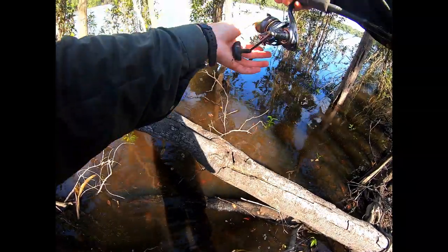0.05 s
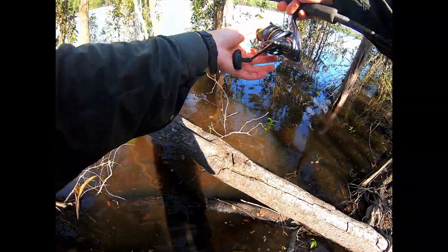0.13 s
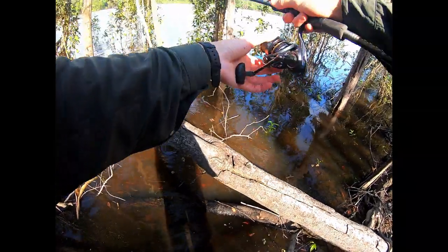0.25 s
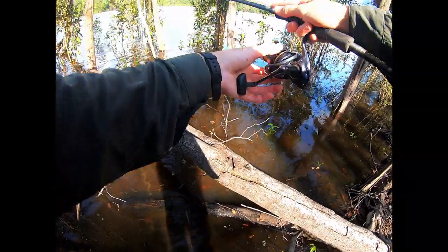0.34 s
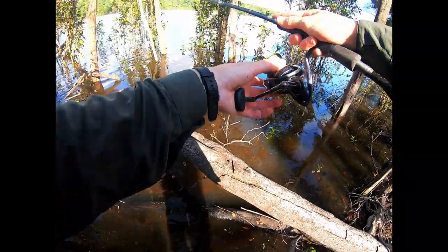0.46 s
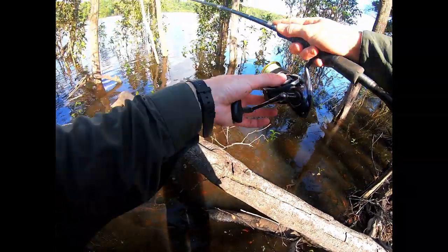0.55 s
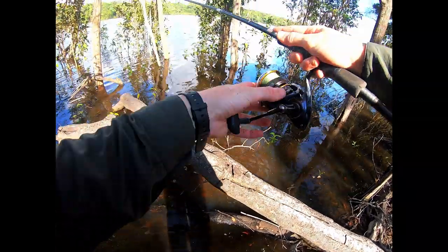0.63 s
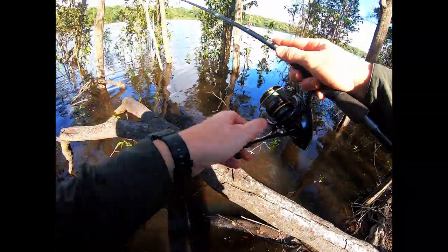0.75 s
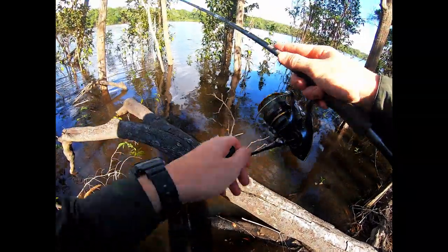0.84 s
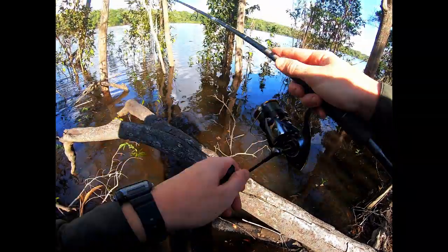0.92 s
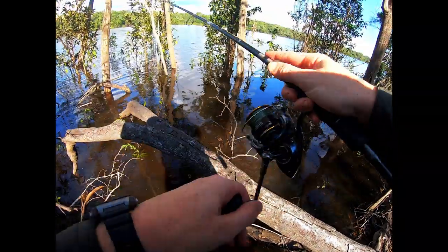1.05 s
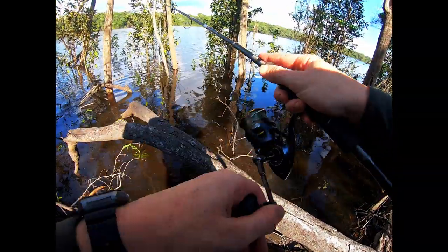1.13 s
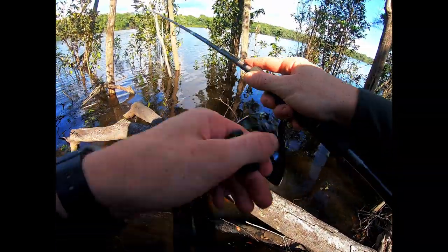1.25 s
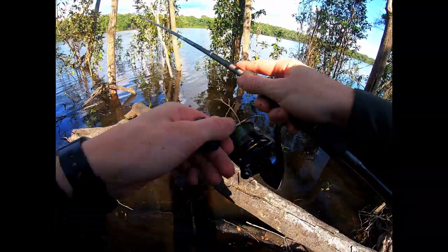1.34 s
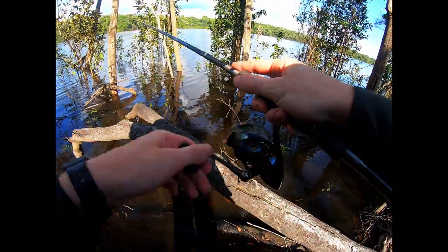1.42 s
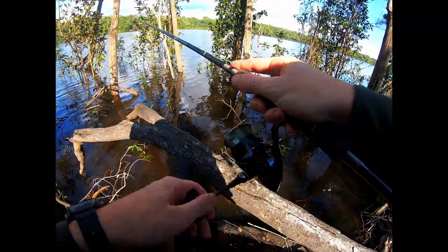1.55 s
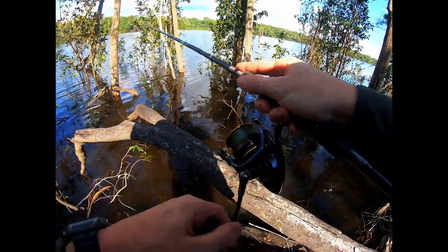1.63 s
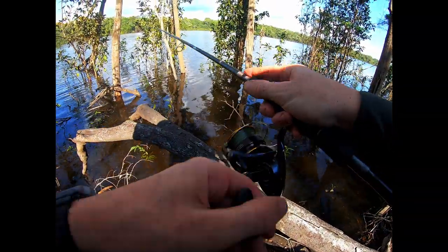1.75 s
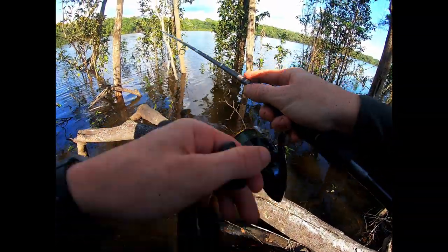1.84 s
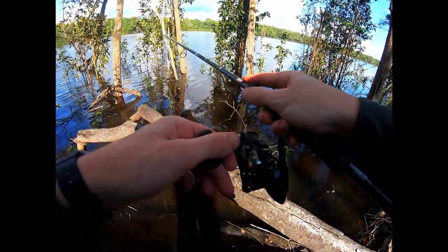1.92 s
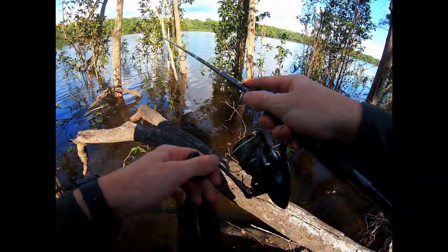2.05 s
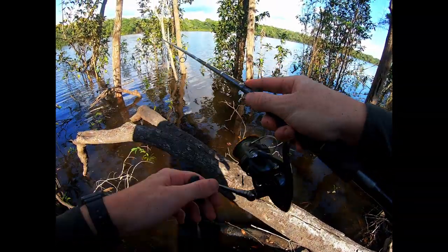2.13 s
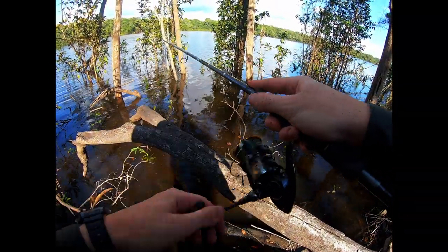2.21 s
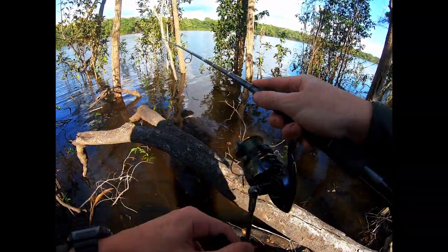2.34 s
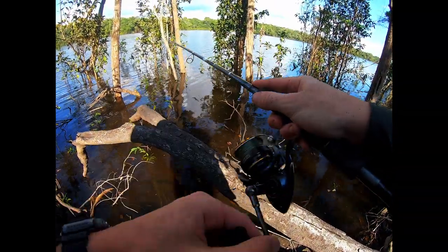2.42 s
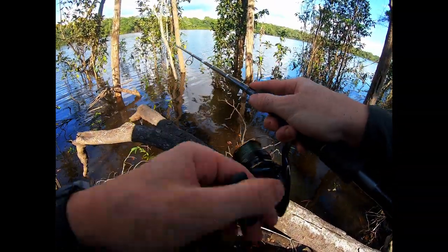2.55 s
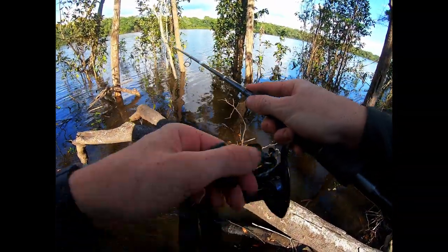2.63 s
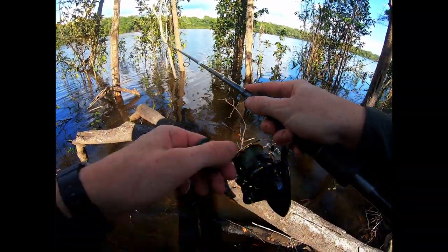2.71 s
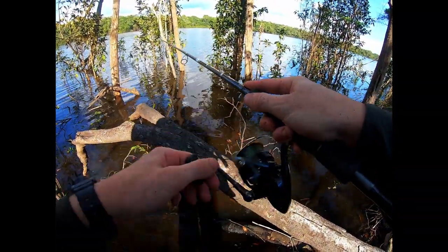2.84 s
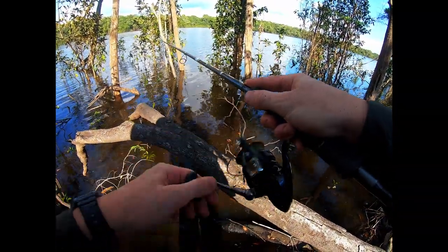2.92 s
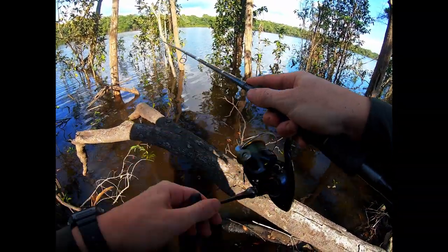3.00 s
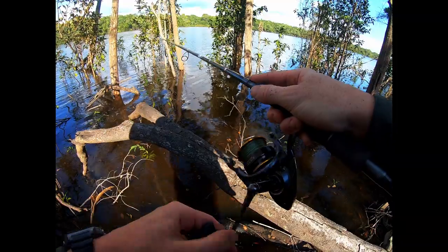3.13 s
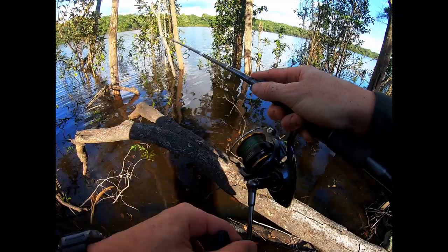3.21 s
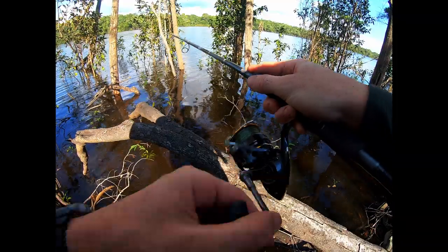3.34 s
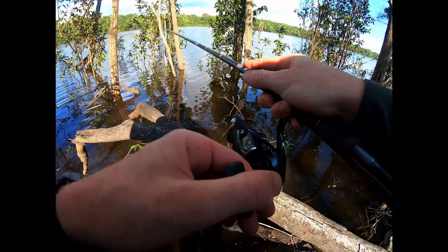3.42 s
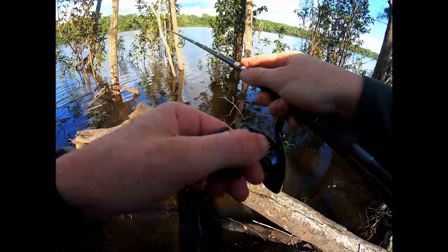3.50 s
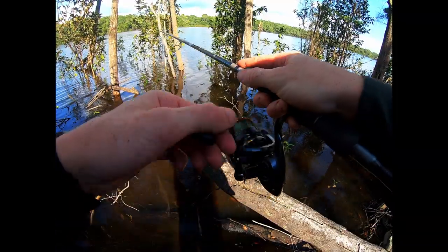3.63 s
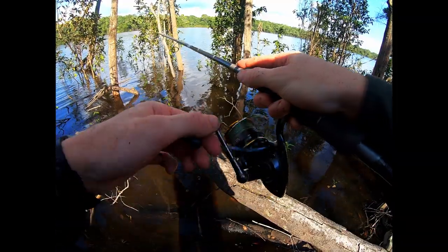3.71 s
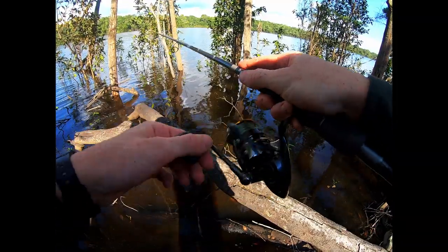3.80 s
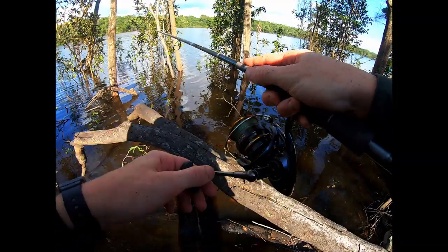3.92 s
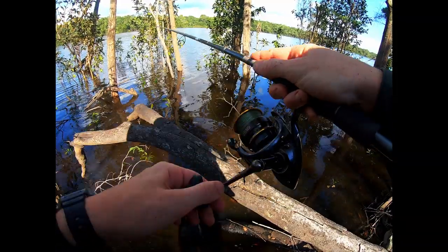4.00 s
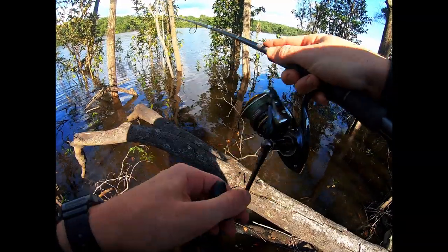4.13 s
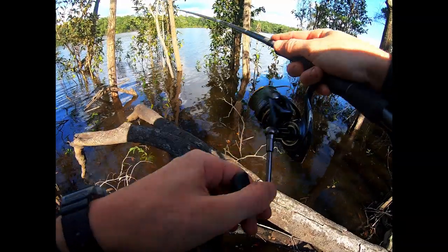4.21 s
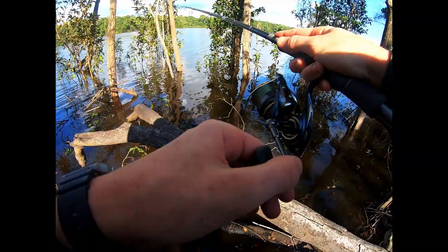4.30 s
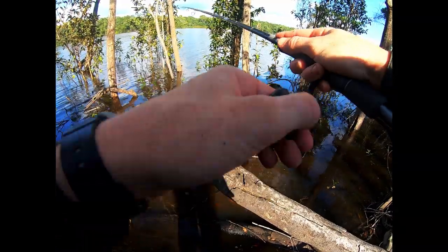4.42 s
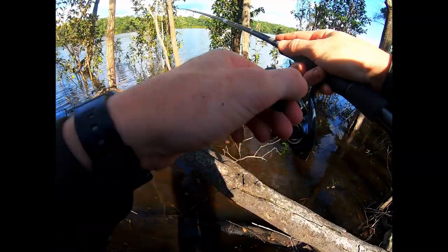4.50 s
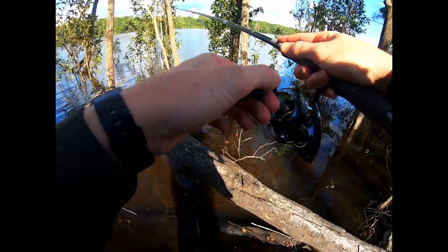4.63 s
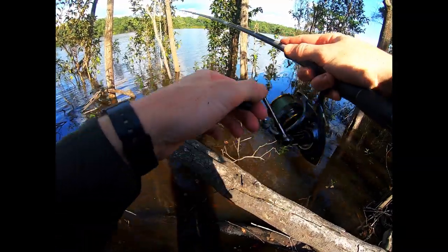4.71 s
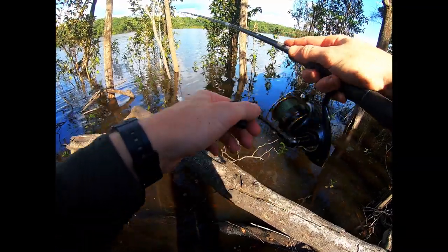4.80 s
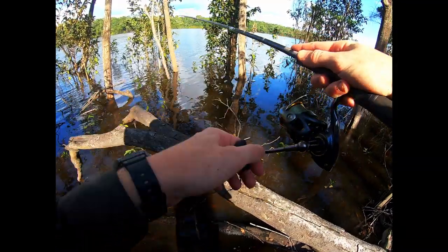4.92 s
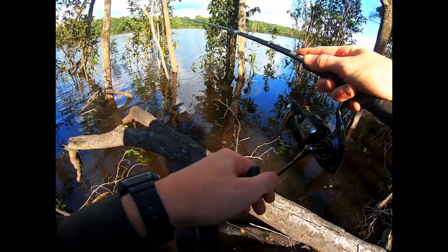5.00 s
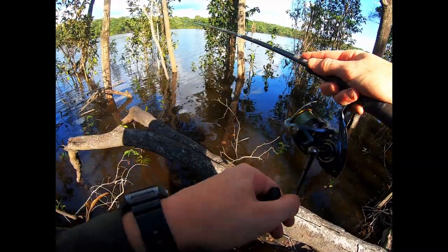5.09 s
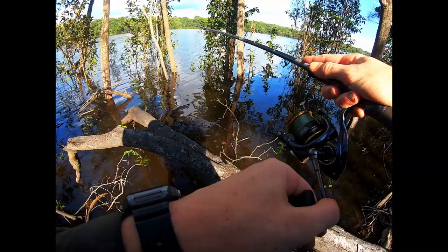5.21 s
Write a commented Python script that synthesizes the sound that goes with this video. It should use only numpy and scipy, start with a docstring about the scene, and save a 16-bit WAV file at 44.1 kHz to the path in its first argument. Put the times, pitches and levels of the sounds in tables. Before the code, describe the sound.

A quiet, open lake shore heard in stereo from the angler's chest: soft low air, slight wavering rush and a thin high hiss throughout. A faint bump opens it, with a tiny tick at 0.2 s and growing sleeve rustle. From 0.55 s hands scuff the tackle, the hinge grates and briefly creaks, and at 0.70 s the bail slams shut with a bright, dry metallic crack, by far the loudest event. It rebounds at 0.73 s and chatters out by 0.77 s, with a dull rod thump and short scatter from the trunks. Light ticks and cloth brushes follow until 0.9 s. From about 1 s the reel winds: a subdued grainy gear whirr, fine fizz and faint wavering singing of wet line. Soft knocks come near 2.2 and 2.5 s. Crisp ticks crowd between 2.8 and 3.9 s, then become mostly fainter and thinner as winding continues to 5.25 s.

```python
"""On a quiet lake shore an angler closes the bail of a spinning reel at chest height and winds in.
Soft outdoor air and thin high hiss are filtered noise; cloth strokes, knocks and scuffs are noise bursts.
The hinge grates and creaks; the bail snaps shut and rebounds as noise cracks over damped metal modes.
Gears then whirr as pulsed noise, and wet line fizzes and sings as friction noise around gliding tones.
Ticks excite short damped modes: clear ones at listed times, faint ones on beats of the reel's speed."""
import sys
import numpy as np
from scipy import signal
from scipy.fft import rfft, irfft
from scipy.io import wavfile

SR = 44100
rng = np.random.default_rng(int(sys.argv[2]) if len(sys.argv) > 2 else 0)


def master(y):
    """Save y as 16-bit WAV."""
    cut = np.clip(np.atleast_2d(y).T, -1, 1)
    pcm = np.round(cut * 32767)  # scale
    wavfile.write(sys.argv[1], SR, pcm.astype(np.int16))


N = 231657
T = np.arange(N) / SR  # s
FREQS = np.maximum(np.arange(N // 2 + 1) * SR / N, 1)  # Hz
TOP_HZ = 15800
MESHES_PER_TICK = 2.8

# correlation of noise between the two ports: [f/Hz, correlation]
PORT_CORRELATION = [(50, -0.19), (250, 0.39), (750, -0.24), (1500, -0.21), (2800, 0.81), (4200, 0.82),
                    (6500, 0.12), (9000, 0.016)]
# spectrum of outdoor air: [f/Hz, relative level/dB]
AIR_SPECTRUM = [(20, -11), (45, -7.5), (70, -18), (108, -29), (160, 2), (230, 0), (330, -7.5), (560, -6),
                (770, -0.5), (980, -4), (1250, -3), (2200, -13), (3500, -24.5), (6500, -6), (8400, -13),
                (11500, -37.5), (15000, -36)]
# steady bands of thin hiss: [f/Hz, width/Hz, level/dB, left minus right/dB]
HISS_BANDS = [(6860, 100, -64.5, -3.5), (7940, 150, -65.5, 2), (8420, 360, -60, -6.5)]
# strokes of sleeve and slack line: [peak t/s, level/dB, rise/s, fall/s]
STROKES = [(.36, -55, .42, 0.33), (.58, -51, 0.059, 0.06), (.755, -43.5, 0.063, 0.036),
           (.895, -45, 0.06, 0.06)]
# spectrum of the strokes: [f/Hz, relative level/dB]
STROKE_SPECTRUM = [(500, -10.5), (2800, -14), (5500, -7), (8200, -2.5), (9200, -7.5), (10400, -14),
                   (11500, -23.5), (15000, -32)]
# knocks and scuffs of hands and tackle: [onset t/s, centre f/Hz, nominal width/Hz, level/dB, time to peak/s]
KNOCKS = [(0, 232, 200, -53, 0.029), (0.197, 2700, 1200, -54.5, .004), (0.527, 6000, 5000, -47, 0.0024),
          (.47, 70, 80, -62, 0.021), (0.556, 4650, 5000, -38, 0.0042), (0.557, 880, 620, -46.5, 0.015),
          (0.592, 860, 400, -42, 0.013), (0.61, 700, 605, -44.5, 0.019), (0.63, 870, 600, -33, 0.001),
          (.915, 38, 25, -59, 0.03), (1.405, 487, 300, -57, 0.066), (2.174, 718, 604, -43, 0.0089),
          (2.184, 390, 150, -43.5, 0.012), (2.466, 1350, 600, -37, 0.006), (4.108, 203, 109, -60, 0.05)]
# clear ticks of the reel as it is handled, settles and turns: [t/s, relative body level/dB, relative ping level/dB]
CLEAR_TICKS = [(0.1967, -44.5, -58), (.7757, -32, -56), (.8205, -35.5, -58), (.8406, -50, -50),
               (.875, -41, -48), (1.5535, -52, -45), (1.574, -54, -41.5), (2.0015, -42, -48),
               (2.109, -37, -49), (2.146, -33, -43), (2.173, -41, -50), (2.8397, -36, -61),
               (2.8698, -44, -50), (2.8995, -38, -61), (2.9617, -41, -53), (2.9924, -30, -41),
               (3.0247, -35.5, -48), (3.0545, -37, -38.5), (3.1077, -42.5, -49), (3.1639, -37, -47),
               (3.187, -37, -46), (3.193, -36, -45), (3.2461, -37, -50), (3.3059, -41, -57),
               (3.334, -39, -56), (3.365, -35.5, -52), (3.5004, -31, -44), (3.5367, -33.5, -50),
               (3.570, -35.5, -54), (3.701, -32, -56), (3.8664, -29, -42.5), (3.9008, -32.5, -45),
               (4.159, -59, -44), (4.251, -56, -46.5), (4.3442, -54, -46.5), (4.403, -40.5, -54),
               (4.438, -54, -48), (4.471, -56, -49.5), (4.504, -56, -49), (4.537, -56, -45.5),
               (4.6333, -62, -45.5), (4.7771, -40.5, -46.5), (4.911, -41, -54), (4.943, -43, -54),
               (5.0913, -40, -47), (5.124, -42, -49), (5.201, -40, -63), (5.233, -39.5, -60)]
# centre levels of the faint ticks on beats between: [t/s, relative body level/dB, relative ping level/dB]
FAINT_TICK_LEVELS = [(1.5, -54, -52), (2.7, -52, -65), (3.2, -56, -57), (3.8, -48, -64), (4.5, -61, -51),
                     (5.0, -58, -60)]
# speed of the reel: [t/s, tick rate/(1/s)]
REEL_SPEED = [(2.15, 40), (3.0, 34), (3.35, 35), (3.5, 27), (3.87, 29.3), (5.2, 32.2)]
# low modes of a tick: [nominal f/Hz, relative level/dB, left minus right/dB]
TICK_BODY_MODES = [(1750, -20, 0), (2680, -14.5, -1), (3060, 0, -1)]
# high modes of a tick: [nominal f/Hz, relative level/dB, left minus right/dB]
TICK_PING_MODES = [(5364, -4.5, -9), (5670, -0.5, -12), (6800, -3, -3), (8270, -7, -4)]
# spectrum of the contact noise in a tick: [f/Hz, relative level/dB]
CONTACT_SPECTRUM = [(500, -3), (1800, 23), (3000, 18.5), (4500, 18.5), (5600, 14),
                    (7000, 21), (10000, 12.5), (14000, -15)]
# grating of the hinge as the bail is pushed over: [t/s, level/dB]
GRATE_LEVEL = [(.553, -58), (.57, -43), (.58, -49), (.6, -47), (.628, -44), (.642, -50.5), (.657, -53.5),
               (.69, -52)]
# spectrum of the grating: [f/Hz, relative level/dB]
GRATE_SPECTRUM = [(1500, -17), (2300, -3), (2750, -9.5), (3350, -3), (4400, -13), (9000, -28), (14000, -43)]
# creak of the hinge: [t/s, mean f/Hz, level/dB]
CREAK_GLIDE = [(.598, 998, -38), (.608, 750, -39), (.612, 360, -33), (.617, 340, -33), (.623, 816, -35.5),
               (.645, 620, -46)]
# blows of the bail as it trips, snaps shut, rebounds and chatters: [t/s, relative level/dB, crack t60/s]
BLOWS = [(0.6057, -23.5, 0.012), (.6305, -30, .013), (0.6922, -14.5, 0.0176), (.7019, 3.5, 0.029),
         (.7035, -4.5, 0.032), (0.7142, -10, 0.012), (0.7271, -1.5, 0.022), (0.7287, -8.5, 0.018),
         (0.7347, -10.5, .026), (.746, -20, .03), (.759, -28, .016), (.7695, -35, .012)]
# ring of bail wire and rotor: [f/Hz, t60/s, relative level/dB, left minus right/dB, phase between ports/rad]
METAL_MODES = [(1047, 0.1, -24.5, -11, 1.1), (1940, 0.06, -17, 3, 0.52), (2108, 0.065, -13, -5, 0.78),
               (2204, 0.06, -16, 3, 1.1), (2450, 0.093, -20, 3, 0.96), (2881, 0.033, -6.5, -3, 0.37),
               (2956, 0.053, -11, 0, .3), (3131, 0.072, -21, -4, 0.11), (3530, 0.06, -16, 0, 0.45),
               (3680, 0.067, -13, 2, 0.12), (4091, 0.083, -17, 0, 0.72), (5430, 0.06, -12, -10, 0.66),
               (5410, 0.044, -11, -10, 0.69), (5675, 0.035, -8.5, -4.5, 0.38),
               (5920, 0.044, -12.5, -13, .5), (6140, 0.06, -14, -5, 0.41), (6500, 0.065, -18, 2, 1.1),
               (7800, 0.049, -18, 3, 1.4)]
# spectrum of the crack at each port: [f/Hz, relative left level/dB, relative right level/dB]
CRACK_SPECTRUM = [(101, -37, -35), (400, -27, -22), (680, -24, -11), (1140, -13, -0.5), (1550, -11, -16.5),
                  (2060, 1, 3), (2500, -4.5, -0.5), (3420, 0, 1.5), (4800, -8, -7.5), (5600, -6, 8.5),
                  (7250, -2, -9), (8930, -9, -3.5), (10900, -14, -21.5), (11400, -29, -35)]
# correlation of the crack between the ports, before limiting to 0.95: [f/Hz, correlation]
CRACK_CORRELATION = [(200, 0.97), (900, -0.24), (2100, 0.78), (4000, 1.0), (6000, 0.28), (8000, -0.19)]
# spectrum of the scatter from the trunks: [f/Hz, relative level/dB]
SCATTER_SPECTRUM = [(100, -17), (300, 7), (1000, 14), (3200, 10.5), (7000, -21), (14000, -32)]
# correlation of the rod's thump between the ports, before limiting to 0.95: [f/Hz, correlation]
THUMP_CORRELATION = [(200, 1.0), (900, 0.84)]
# winding effort, the reference for whirr and fizz: [t/s, relative level/dB]
EFFORT = [(1.0, -70.5), (1.18, -58.5), (1.32, -57), (1.83, -55), (2.04, -55.5), (2.17, -55.5),
          (2.99, -57.5), (4.02, -61.5), (4.35, -59), (4.59, -61.5), (5.02, -59.5), (5.25, -58)]
# spectrum of the running gears at each port: [f/Hz, relative left level/dB, relative right level/dB]
GEAR_SPECTRUM = [(153, -45, -28), (422, -2, 0), (860, -23.5, -11), (1930, -3.5, -9), (2800, -6.5, -3.5),
                 (3530, -6.5, -5.5), (4530, -12.5, -11), (5900, -13, -7), (6750, -23, -23),
                 (7400, -26, -26), (8250, -17, -9), (8400, -30, -27), (15000, -42, -47)]
# narrow wavering gear resonances: [f/Hz, width/Hz, mean level against effort/dB]
GEAR_RESONANCES = [(796, 210, -10), (1260, 420, -4), (2100, 190, -12), (2853, 150, -7.5)]
# fine fizz of wet line: [t/s, mean level against effort/dB]
FIZZ_LEVEL = [(1.2, -10.5), (2.1, -12.5), (2.8, -13), (3.2, -4.5), (3.7, -31), (4.3, -11), (5.25, -7.5)]
# spectrum of the fizz: [f/Hz, relative level/dB]
FIZZ_SPECTRUM = [(2000, -7), (6000, -3.5), (10200, 9.0), (11500, -4.0), (13000, -2.5), (15500, -13)]
# line rubbing low on the roller: [t/s, mean f/Hz, mean level/dB]
ROLLER_RUB = [(1.0, 1195, -79), (1.55, 1130, -61), (1.66, 1087, -50), (1.79, 1171, -57.5),
              (1.89, 1041, -53), (2.12, 960, -60), (2.47, 1102, -53.5), (2.8, 1002, -71)]
# wet line rubbing over the guides: [t/s, mean f/Hz, mean level/dB]
GUIDE_RUB = [(1.1, 2090, -62), (1.4, 1850, -63), (1.78, 1820, -55.5), (2.0, 1895, -63), (2.42, 1740, -66),
             (2.53, 1678, -55), (2.9, 1755, -59.5), (3.15, 1697, -55), (3.36, 1703, -55),
             (3.58, 1900, -61.5), (3.8, 2062, -55.5), (3.98, 2120, -64), (4.22, 2222, -57.5),
             (4.76, 1836, -53), (5.25, 1853, -54.5)]


def undb(db):
    """Amplitude ratio: twenty decibels make a factor of ten."""
    return 10 ** (np.asarray(db) / 20)


def unit(x):
    """Normalization to a root-mean-square value of 1."""
    return x / np.sqrt(np.mean(x ** 2))


def curve(rows, axis=1):
    """Linear interpolation of one table column in time."""
    rows = np.array(rows)
    return np.interp(T, rows[:, 0], rows[:, axis])


def pan(db):
    """Level difference between ports: left and right gains that differ by db."""
    return undb(np.array([[db], [-db]]) / 2)


def over_hz(rows):
    """Interpolation of spectral columns along logarithmic frequency."""
    hz, *columns = np.transpose(rows)
    return np.array([np.interp(np.log(FREQS), np.log(hz), c) for c in columns])


def colour(x, rows):
    """Minimum-phase filtering: a folded cepstrum gives a causal filter of unit power gain."""
    gain = unit(undb(over_hz(rows)))
    cepstrum = irfft(np.log(gain), N)
    cepstrum[:, 1:N // 2] *= 2
    cepstrum[:, N // 2:] = 0
    return irfft(rfft(x) * np.exp(rfft(cepstrum)), N)


def band(x, hz, width):
    """Cascaded resonance: the same peak applied twice steepens its skirts."""
    b, a = signal.iirpeak(hz, hz / (1.5 * width), SR)
    once = signal.lfilter(b, a, x)
    return signal.lfilter(b, a, once)


def noise(likeness=PORT_CORRELATION):
    """Partial coherence: mid and side white noise mix to a set correlation at each frequency."""
    alike = np.clip(over_hz(likeness), -.95, .95)
    mid, side = rfft(rng.standard_normal((2, N)))
    common = mid * np.sqrt(1 + alike)
    opposed = side * np.sqrt(1 - alike) * np.array([[1], [-1]])
    return unit(irfft(common + opposed, N))


def walk(rate):
    """Low-passed random fluctuation of rms 1, with its corner at rate in Hz."""
    return unit(irfft(rfft(rng.standard_normal(N)) / (1 + (FREQS / rate) ** 4), N))


def grains(db, rate):
    """Random amplitude modulation in decibels, as a gain."""
    return undb(db * walk(rate))


def fade(s, t60):
    """Exponential decay from s by 60 dB per t60, held after two such spans."""
    return (T >= s) * np.exp(-np.log(1000) * np.clip((T - s) / t60, 0, 2))


def outdoors(air_db=-57, rush_db=-67.5, waver_db=2.3, buffet_db=-76, buffet_waver_db=4):
    """Broadband and resonant noise: soft air, a low wavering rush, slight port buffeting and high hiss."""
    air = undb(air_db + 1.7 * walk(5.5)) * colour(noise(), AIR_SPECTRUM)
    rush = undb(rush_db + waver_db * walk(4.6)) * unit(band(noise(), 187.6, 68))
    buffet = undb(buffet_db + buffet_waver_db * walk(4.2)) * unit(band(noise(), 32, 26))
    source, hiss = noise(), 0
    for hz, width, db, pan_db in HISS_BANDS:
        hiss = hiss + undb(db) * pan(pan_db) * unit(band(source, hz, width))
    return air + rush + buffet + hiss


def sleeve(grain_db=2.0):
    """Friction noise under Gaussian envelopes: cloth and slack line brush as the hand reaches for the handle."""
    power = 0
    for s, db, rise, fall in STROKES:
        distance = (T - s) / np.where(T < s, rise, fall)
        power = power + undb(db) ** 2 * np.exp(-2 * distance ** 2)
    return np.sqrt(power) * colour(noise() * unit(grains(grain_db, 460)), STROKE_SPECTRUM)


def bumps():
    """Impulsive contact: hands and tackle give short pulses of band-limited noise."""
    source, out = noise(), np.zeros((2, N))
    for s, hz, width, db, length in KNOCKS:
        span = slice(int(s * SR), int(s * SR) + SR // 2)
        push = np.clip((T[span] - s) / length, 0, 20)
        edges = np.clip(hz * np.exp(np.array([-1, 1]) * 0.55 * width / hz), 10, TOP_HZ)
        bandpass = signal.butter(3, edges, "band", fs=SR, output="sos")
        body = signal.sosfilt(bandpass, source[:, span])
        out[:, span] += undb(db) * push * np.exp(1 - push) * unit(body)
    return out


def beat():
    """Phase as the integral of rate: tick intervals gone by at the reel's speed."""
    return np.cumsum(curve(REEL_SPEED)) / SR


def tick_events(spread_db=3):
    """Periodic excitation: clear ticks at listed times, and faint ones on the beats between them."""
    beats = np.flatnonzero(np.diff(np.floor(beat())) > 0)
    scatter = spread_db * rng.standard_normal((256, 2))
    levels = np.array([curve(FAINT_TICK_LEVELS), curve(FAINT_TICK_LEVELS, axis=2)]).T
    faint = []
    for i, chance in zip(beats, scatter):
        gap = min(abs(T[i] - tick[0]) for tick in CLEAR_TICKS)
        if T[i] > FAINT_TICK_LEVELS[0][0] and gap > 1 / 50:
            faint.append((T[i], *(levels[i] + chance)))
    return CLEAR_TICKS + faint


def ticks(body_db=-3.0, ping_db=-1, snap_db=-6, rasp_db=-11, peak_s=0.00093, peak_spread=0.11,
          detune_spread=0.023, mode_spread_db=1.85):
    """Modal excitation: a tiny rasp rings the damped body and higher pings, varied in length and colour."""
    age = T[:SR // 50]
    out, contact = np.zeros((2, N + len(age))), np.zeros(N + len(age))
    hz, mode_db, pan_db = np.transpose(TICK_BODY_MODES + TICK_PING_MODES)
    ports = undb(np.array([pan_db, -pan_db]) / 2)
    mode_counts = [len(TICK_BODY_MODES), len(TICK_PING_MODES)]
    chances = rng.standard_normal((256, 4, len(hz)))
    for (s, low_db, high_db), (detune, weight, phase, stretch) in zip(tick_events(), chances):
        span = slice(int(s * SR), int(s * SR) + len(age))
        progress = age / (peak_s * np.exp(peak_spread * stretch[0]))
        push = (progress * np.exp(1 - progress)) ** 2
        drive_db = np.repeat([low_db + body_db, high_db + ping_db], mode_counts)
        gains = ports * undb(drive_db + mode_db + mode_spread_db * weight)
        cycles = np.outer(hz * (1 + detune_spread * detune), age) + phase[:, None]
        out[:, span] += push * (gains @ np.sin(2 * np.pi * cycles))
        contact[span] += push * np.hypot(undb(high_db + snap_db), undb(low_db + rasp_db))
    return out[:, :N] + colour(noise() * contact[:N], CONTACT_SPECTRUM)


def grate(grain_db=5):
    """Dry friction: fine metal-on-metal grains from the hinge as the bail is pushed over."""
    on = (T > GRATE_LEVEL[0][0]) & (T < GRATE_LEVEL[-1][0])
    grainy = noise() * unit(grains(grain_db, 600))
    return on * undb(curve(GRATE_LEVEL)) * colour(grainy, GRATE_SPECTRUM)


def hinge(rough=0.1815):
    """Frequency modulation: the dragging hinge creaks as a short tone of unsteady pitch."""
    hz = curve(CREAK_GLIDE) * (1 + rough * walk(408))
    on = (T > CREAK_GLIDE[0][0]) & (T < CREAK_GLIDE[-1][0])
    tone = np.sin(2 * np.pi * np.cumsum(hz) / SR)
    return on * undb(curve(CREAK_GLIDE, axis=2)) * tone * pan(-1.6)


def bail(crack_db=-11, ring_db=-12, shore_db=-42, shore_t60=0.36):
    """Impact and modal decay: the sprung wire hits its stop, cracks, rings and scatters from the trunks."""
    metal, crack, scatter = np.zeros((2, N)), 0, 0
    age, ring = T[:SR // 5], []
    for hz, t60, db, pan_db, phase in METAL_MODES:
        angle = 2 * np.pi * hz * age + np.array([[phase], [0]])
        ring.append(undb(db) * pan(pan_db) * np.exp(1j * angle - np.log(1000) * age / t60))
    ring = np.array(ring)
    for s, db, t60 in BLOWS:
        # every blow lands on another spot and starts the modes in new phases
        start = np.exp(2j * np.pi * rng.random(len(ring)))
        span = slice(int(s * SR), int(s * SR) + len(age))
        metal[:, span] += undb(db) * np.tensordot(start, ring, 1).imag
        crack = crack + (undb(db) * fade(s, t60)) ** 2
        # the scatter sets in 12 ms after the blow
        scatter = scatter + (undb(db) * fade(s + 0.012, shore_t60)) ** 2
    shore = colour(noise() * np.sqrt(scatter), SCATTER_SPECTRUM)
    shock = colour(noise(CRACK_CORRELATION) * np.sqrt(crack), CRACK_SPECTRUM)
    return undb(crack_db) * shock + undb(ring_db) * metal + undb(shore_db) * shore


def thump(hz=337, width_hz=550, level_db=-41, t60=0.21):
    """Forced response: each blow of the bail shakes the rod, which answers dully."""
    power = sum((undb(db) * fade(s, t60)) ** 2 for s, db, _ in BLOWS)
    rod = unit(band(noise(THUMP_CORRELATION), hz, width_hz))
    return undb(level_db) * np.sqrt(power) * rod


def rub(rows, flutter_hz, patchy_db, core_db, grain_db=2.5, wander=.015):
    """Stick-slip friction: a grainy noise band surrounds a thin singing core of wandering pitch."""
    hz = curve(rows) * (1 + wander * walk(14))
    carrier = np.exp(2j * np.pi * np.cumsum(hz) / SR)
    white = rng.standard_normal((2, N)) + 1j * rng.standard_normal((2, N))
    flutter = signal.lfilter(*signal.butter(2, flutter_hz, fs=SR), white)
    grainy = flutter / np.std(flutter) * unit(grains(grain_db, 90))
    friction = grainy + undb(core_db) * walk(18.4)
    return undb(curve(rows, axis=2) + patchy_db * walk(19)) * unit((friction * carrier).real)


def reel(whirr_db=2.0, strand_waver_db=2.1, fizz_waver_db=1.4, mesh_depth=0.11, grain_db=2.5):
    """Gear-mesh modulation and line friction: teeth pulse the whirr; effort sets whirr and fizz."""
    effort = curve(EFFORT)
    turning = np.clip((T - .9) / 0.092, 0, 1)
    teeth = 1 + mesh_depth * np.sin(2 * np.pi * MESHES_PER_TICK * beat())
    pulsed = noise() * unit(teeth * grains(grain_db, 960))
    gears = undb(effort + whirr_db) * colour(pulsed, GEAR_SPECTRUM)
    for hz, width, db in GEAR_RESONANCES:
        strand = unit(band(noise(), hz, width))
        gears = gears + undb(effort + db + strand_waver_db * walk(16)) * strand
    sparks = unit(teeth * grains(6.5, 830))
    fizz_db = effort + curve(FIZZ_LEVEL) + fizz_waver_db * walk(3.5)
    fizz = undb(fizz_db) * colour(noise() * sparks, FIZZ_SPECTRUM)
    roller = rub(ROLLER_RUB, flutter_hz=140, patchy_db=1, core_db=-6) * pan(-8.0)
    guides = rub(GUIDE_RUB, flutter_hz=185, patchy_db=1.27, core_db=-10.5) * pan(3.9)
    return turning * (gears + fizz + roller + guides)


def scene():
    """Superposition: the sum of all sources at the angler's chest."""
    surroundings_and_contacts = outdoors() + sleeve() + bumps() + ticks()
    closing = grate() + hinge() + bail() + thump()
    return surroundings_and_contacts + closing + reel()


def record(dry):
    """Saturation and band limiting: clipping at full scale, then a steep low-pass."""
    lowpass = signal.ellip(10, .2, 80, TOP_HZ, fs=SR, output="sos")
    return signal.sosfilt(lowpass, np.clip(dry, -1, 1))


dry = scene()
out = record(dry)
master(out)
```